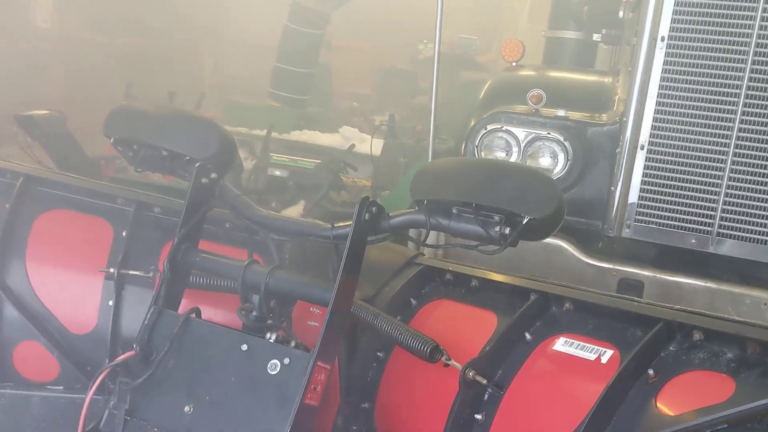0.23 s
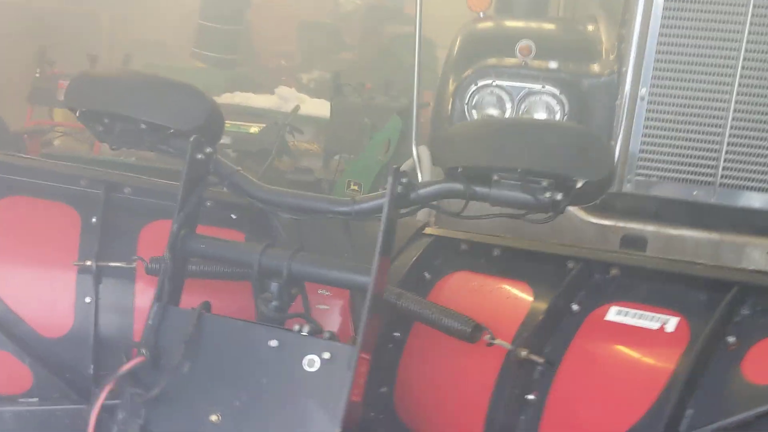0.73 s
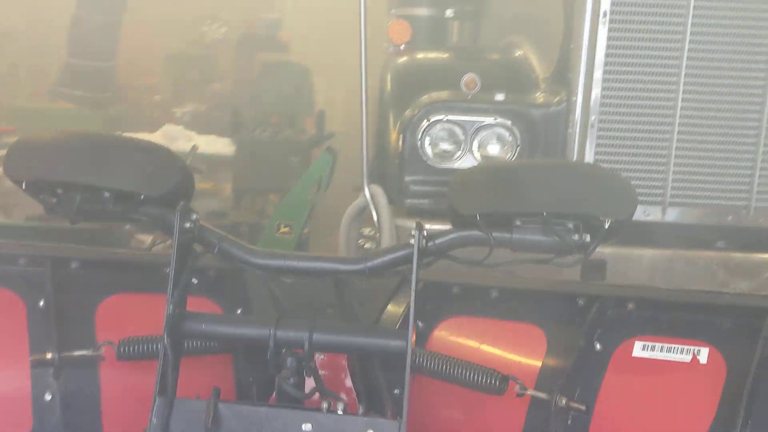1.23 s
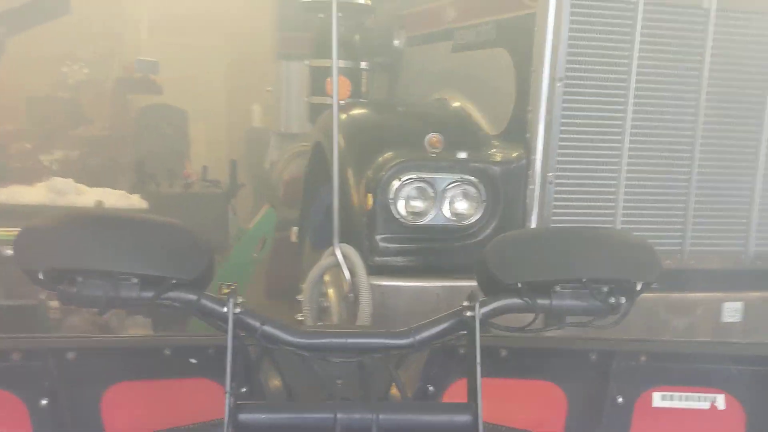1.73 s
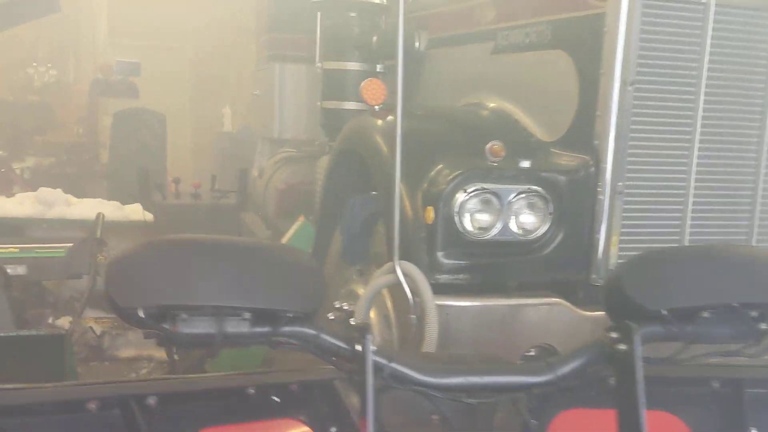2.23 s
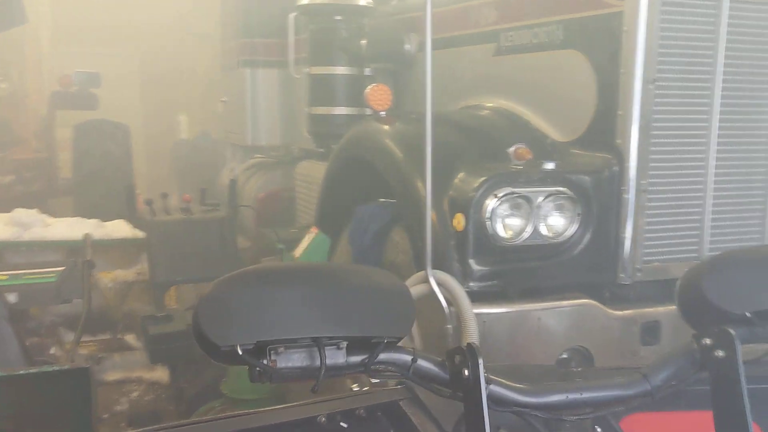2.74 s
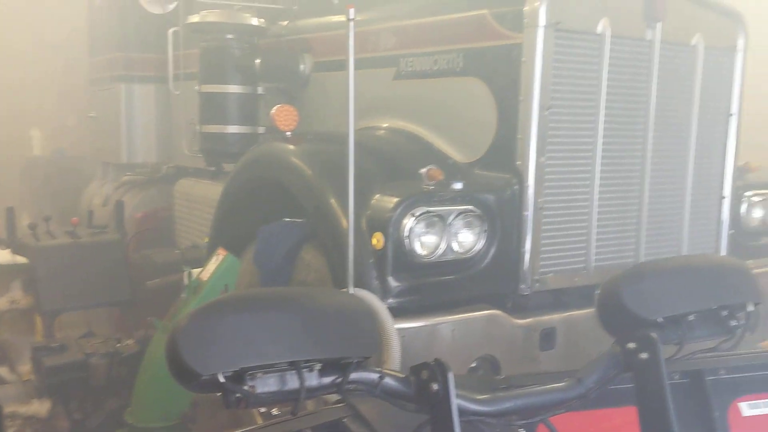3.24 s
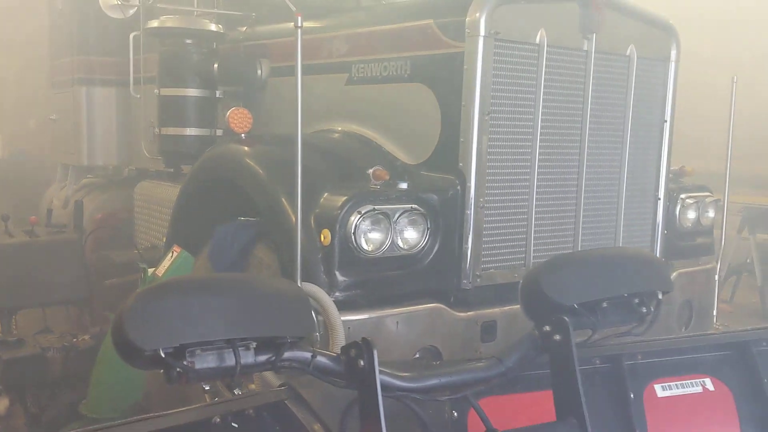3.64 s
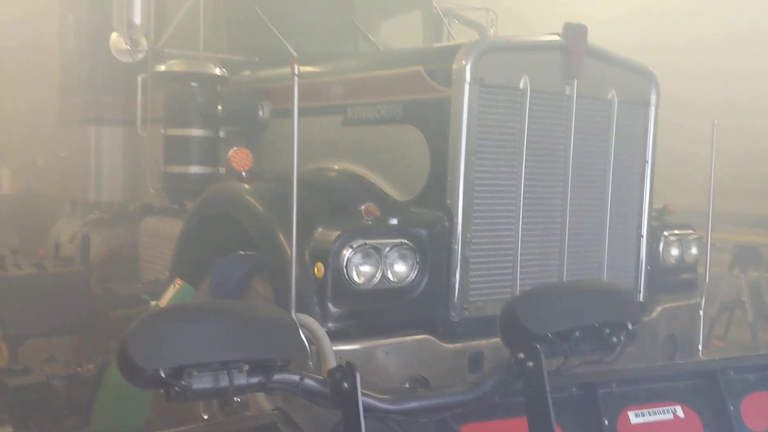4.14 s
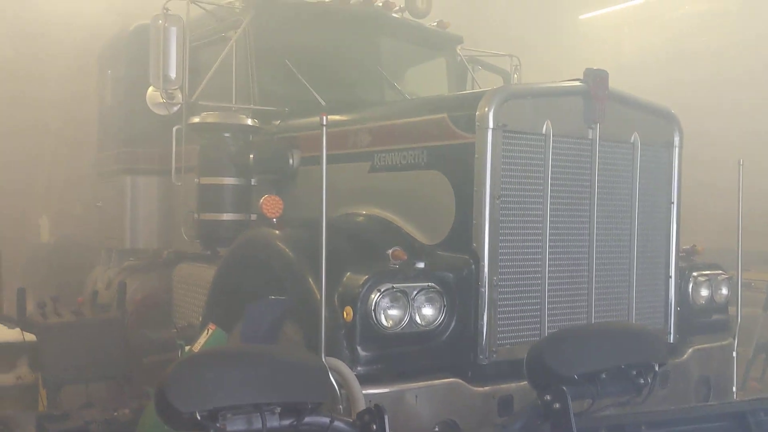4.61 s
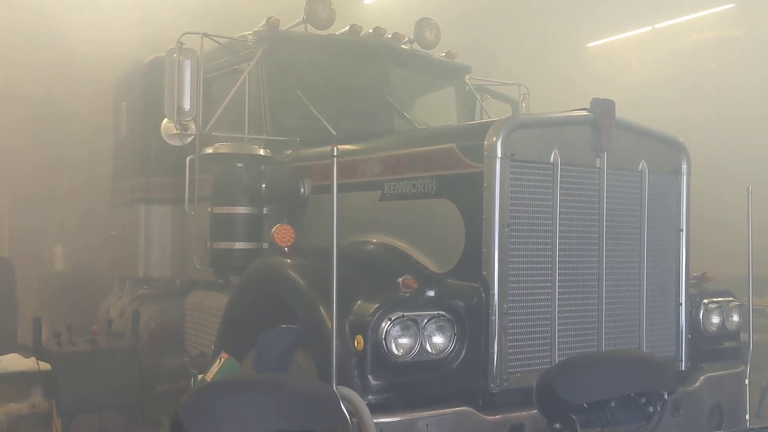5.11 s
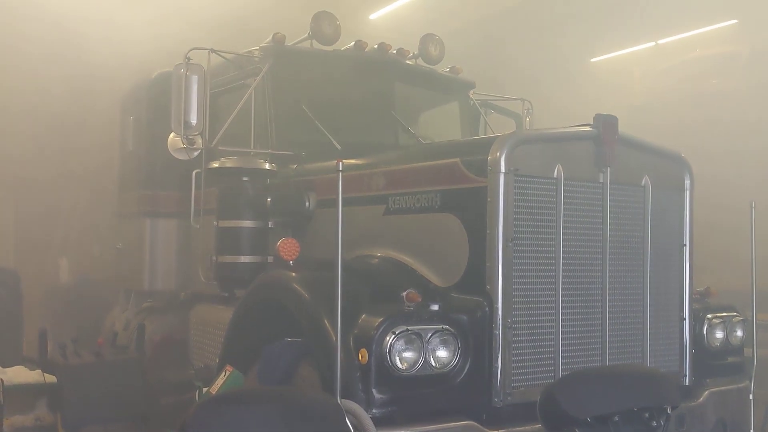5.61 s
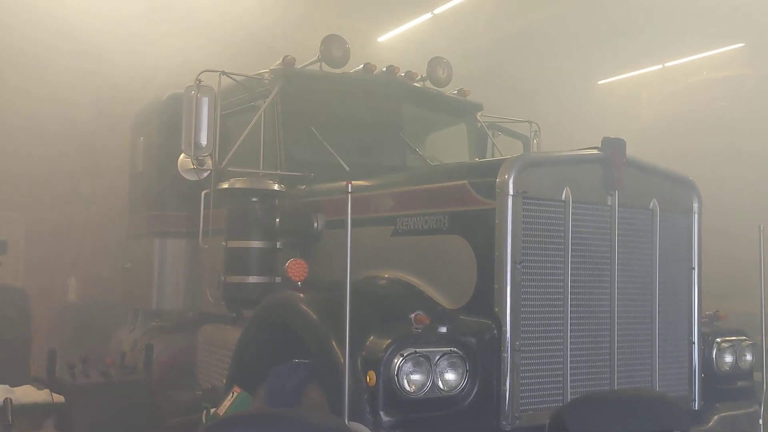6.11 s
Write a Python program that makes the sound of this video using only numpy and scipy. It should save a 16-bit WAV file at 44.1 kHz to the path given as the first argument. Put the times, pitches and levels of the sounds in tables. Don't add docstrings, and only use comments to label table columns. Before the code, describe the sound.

A large two-stroke diesel idles continuously inside a closed workshop, heard in stereo from a few steps away. A strong low drone carries uneven, limping firing pulses, with blower roar, dense valve clatter, rattling thin metal and airy hiss above. Speed sags and recovers every second or so. Around two seconds, tiny bright metal ticks and faint jingling come close to the microphone, then vanish while the engine continues.

```python
import sys
import numpy as np
from scipy import signal
from scipy.fft import rfft, irfft, next_fast_len
from scipy.io import wavfile
from scipy.ndimage import uniform_filter1d, map_coordinates

SR = 44100
rng = np.random.default_rng(int(sys.argv[2]) if len(sys.argv) > 2 else 0)


def volts_from_db(level):
    exponent = np.asarray(level, float) / 20
    return 10 ** exponent


def persist_wave(psi):
    counts = np.round(np.clip(psi, -1, 1) * 32767).astype(np.int16)
    wavfile.write(sys.argv[1], SR, np.atleast_2d(counts).T)


N = 280454

IDLE_RPS = 8.62

# t/s, speed/(rev/s)
SHAFT_SPEED = [(0, 8.53), (.41, 8.546), (.68, 8.743), (.89, 8.64), (1.6, 8.604), (1.9, 8.712),
               (2.37, 8.508), (2.72, 8.532), (3.1, 8.803), (3.32, 8.687), (3.79, 8.317), (4.13, 8.57),
               (4.41, 8.925), (4.62, 8.902), (5.17, 8.316), (5.59, 8.482), (6.13, 8.86), (6.36, 8.7)]


def speed():
    return curves(SHAFT_SPEED)[0]


def crank():
    return np.cumsum(speed()) / SR + .013


def sensed():
    flywheel_s = .15
    return uniform_filter1d(speed(), round(flywheel_s * SR), mode="nearest")


# order/(cycles per turn), level/dB rms
SIDE_ORDERS = [(3, -50), (5, -39), (6, -51), (7, -35), (9, -36), (10, -35), (14, -40), (15, -35), (16, -28),
               (17, -30), (18, -38), (19, -39), (20, -30), (21, -28), (22, -35), (23, -43), (24, -41),
               (25, -35), (26, -34), (27, -39), (28, -38), (29, -41)]


def drone():
    step = 16
    angle = 2 * np.pi * crank()[::step]
    sag = np.maximum(IDLE_RPS - sensed()[::step], 0)
    back = camera()[0][::step]

    boom_rps, boom_fall_db = 8.71, 65
    boom_db = -boom_fall_db * (sensed() - boom_rps) ** 2
    twelfth_db = (level(-12.5, .5, -1.5, -1) + boom_db)[::step]
    fourth_db = level(-26.5, 1, 5, -1)[::step]
    eighth_db = level(-33, 9, 9, -5)[::step]
    throb_db = level(0, 8, -3, 1)[::step]
    growl_db = level(-2.5, 9.5, 2.5, .5)[::step]
    rasp_db = level(-.5, -3, -1, 1)[::step]
    swell_db = [0, throb_db, growl_db, rasp_db]

    limp = volts_from_db(-7 - .4 * twelfth_db) * np.cos(angle - .55)
    twelfth_phase = 12 * angle + .1 + .28 * limp + .18 * wobble(5)[::step]
    tone = volts_from_db(twelfth_db) * (1 + .17 * limp) * np.cos(twelfth_phase)
    tone += volts_from_db(fourth_db) * np.cos(4 * angle)
    tone += volts_from_db(eighth_db) * np.cos(8 * angle + 2)

    pushing_orders = (7, 26)
    fuel_turn, path_turn = 5.5, 2
    for order, db in SIDE_ORDERS:
        group = np.searchsorted([13, 18, 22], order)
        lag = np.pi * (order not in pushing_orders) - 1.3 * max(order - 17, 0)
        if order % 4 == 0:
            lag = np.pi + fuel_turn * sag + path_turn * back * (order > 16)
        phase = lag + rng.normal(0, .01 * order) + .03 * order * wobble(3)[::step]
        order_db = db + swell_db[group] + 2.3 * wobble(3)[::step]
        tone += volts_from_db(order_db) * np.cos(order * angle + phase)
    lean = panned(level(-.76, -.15, 1.45, 0))
    return lean * np.sqrt(2) * signal.resample_poly(tone, step, 1)[:N]


# crank position/turn, level/dB
CYLINDERS = [
    (0.052, 4.5),
    (.17, 4.5),
    (0.308, -3.5),
    (0.419, 4),
    (0.541, -1.5),
    (.69, -5.5),
    (0.807, -16),
    (0.938, 2.5),
]


def puffs():
    turns = crank()
    return sum(volts_from_db(db) * np.exp(-((turns - at) % 1) / .06) for at, db in CYLINDERS)


def firing_train():
    turns, size = crank(), 2048
    bins = np.arange(size // 2 + 1)
    trains = irfft(np.exp(2j * np.pi * rng.random((2, 18, len(bins)))) * (bins < 200))
    where = [turns / 3.5, turns % 1 * size]
    pair = np.array([map_coordinates(np.pad(t, ((0, 0), (0, 1)), "wrap"), where, order=1) for t in trains])
    blend = where[0] % 1
    return pair / np.hypot(blend, 1 - blend)


# f/Hz, level/(dB per Hz)
STACK = [(150, -18), (255, -3), (292, 4.5), (328, -4), (361, 4), (389, -9.5), (429, -2), (470, -26),
         (600, -59), (1500, -120)]


def exhaust(train, firing):
    fuel = np.clip(8.9 - speed(), 0, 1)
    blow = 0.47 + (0.55 + 0.88 * fuel) * firing
    return volts_from_db(level(-22, 3, -5.5, -1)) * spread(blow * train, STACK)


# f/Hz, level/(dB per Hz)
BLOCK = [(350, -38), (470, -4), (540, -4.5), (683, -2), (735, -5.5), (877, 1), (1100, -9.5), (1430, -18),
         (2400, -120)]


def block(train, firing):
    lean = panned(level(-.43, 0, .84, -2.6))
    return volts_from_db(level(-27, 2.5, 1, 1)) * lean * spread((1.2 + firing) * train, BLOCK)


def bark():
    train, firing = firing_train(), puffs()
    return shop(exhaust(train, firing) + block(train, firing))


# f/Hz, level/(dB per Hz)
ROAR = [(250, -10.5), (330, -11.5), (500, -12), (734, -8.5), (880, -5), (1170, -9), (1570, -10),
        (1800, -14), (2020, -27), (2400, -23.5), (3000, -47), (5000, -120)]


def blower(breath_db):
    angle = 2 * np.pi * crank()
    pulse_db = 0.26 * np.cos(angle - 2.5) + 0.57 * np.cos(4 * angle - 1.1)
    roar_db = level(-24.5, 2.5, 1, 1) + pulse_db + 0.11 * breath_db
    lean = panned(level(2.07, 0, .84, -2.6))
    return shop(volts_from_db(roar_db) * lean * rush(ROAR, patchy_db=0.2))


# f/Hz, level/(dB per Hz)
VALVES = [(1500, -60), (1900, -1.5), (2300, -1.5), (2800, -6.5), (3600, -14), (6000, -120)]


def valves(breath_db):
    valve_db = level(-39, 4, 1, 5.5) + .2 * breath_db
    return volts_from_db(valve_db) * panned(level(2.88, 2, -6.5, -6)) * rush(VALVES, patchy_db=1.0)


# f/Hz, level/(dB per Hz)
CLATTER = [(2000, -52), (2700, -8), (3220, 0), (3630, -4.5), (4150, -2), (4850, -6.5), (5100, -39),
           (6630, -52), (11200, -120)]


def rattle(breath_db):
    return volts_from_db(level(-35.5, 3.5, -.5, 1) + 0.2 * breath_db) * rush(CLATTER, patchy_db=.9)


# f/Hz, level/(dB per Hz)
HISS = [(4500, -25), (5000, -8.5), (6500, -14.5), (9000, -13), (13000, -17), (16000, -23)]
# f/Hz, width/Hz, level/dB
PORT = [(5685, 880, 13.5), (7540, 870, 6), (9680, 650, 5), (11800, 360, 6), (14900, 2000, 6)]


def hiss(breath_db):
    once = np.cos(2 * np.pi * crank() - 2.5)
    air_db = level(-34.5, 4, 1, .5) + .5 * once + 0.22 * breath_db + 0.42 * wobble(25)
    return volts_from_db(air_db) * unit(filtered(rush(HISS, patchy_db=0.42), peaks(PORT)))


# t/s, peak level/dB, f/Hz, left minus right/dB
TICKS = [(1.9415, -43, 11800, 9), (1.9889, -31, 12000, 14), (2.0488, -35, 11700, 5.5),
         (2.2463, -31, 11300, 4), (2.2892, -32, 15000, 6.5), (2.3132, -33.5, 14900, 8.0),
         (2.3541, -26, 15000, 8.0), (2.3825, -28, 15000, 7.0), (2.4289, -30, 13900, 6.0),
         (2.5032, -27, 15000, 7.5), (2.6644, -46, 11500, -4)]


def ticks():
    out, t = np.zeros((2, N)), np.arange(SR // 8) / SR
    decay = volts_from_db(-60 * t / 0.014) + 0.73 * volts_from_db(-60 * t / 0.12) + .15 * volts_from_db(-60 * t / .3)
    for s, db, hz, pan_db in TICKS:
        fizz = rng.standard_normal((2, len(t))) * decay
        fizz *= 1 - np.exp(-t / .001)
        band = signal.butter(2, [0.94 * hz, min(1.04 * hz, SR / 2.2)], "band", fs=SR, output="sos")
        snap = signal.sosfilt(band, fizz) + 0.41 * np.diff(fizz, prepend=0) * volts_from_db(-60 * t / .15)
        out[:, round(s * SR):][:, :len(t)] += volts_from_db(db + 4.5) * panned(pan_db - 4)[:, None] * snap
    return out


def jingle():
    start_s, rise_s, hold_s, t60_s = 2.27, .25, .26, .4
    grains = volts_from_db(5.5 * wobble(120)) * rng.standard_normal((2, N))
    bright = lambda hz: np.exp(-((hz - 14800) / 1500) ** 2) + .3 * np.exp(-((hz - 11800) / 900) ** 2)
    t = np.arange(N) / SR - start_s
    fade = np.maximum(-t / rise_s, 0) + np.maximum((t - hold_s) / t60_s, 0)
    return volts_from_db(-44 - 60 * fade) * unit(filtered(grains, bright))


# f/Hz, level/(dB per Hz)
RUMBLE = [(12, -60), (22, -30), (54, -27), (82, -28), (103, -30), (125, -9), (200, -13.5), (300, -2.5),
          (500, -48), (650, -38), (1100, -120)]


def rumble():
    return volts_from_db(-34) * rush(RUMBLE, patchy_db=1.5)


# f/Hz, width/Hz, level/dB
SHOP_MODES = [(431, 9, 6.5), (505.6, 8.3, 12.5), (590, 11.6, 6.5), (695.6, 8.9, 8.5), (856, 8.7, 2)]


def shop(x):
    share = 0.42 + 0.81 * camera()[0]
    return x + share * (filtered(x, peaks(SHOP_MODES)) - x)


# t/s, stepped back/(0-1), swung toward the grille/(0-1)
CAMERA = [
    (0, 0, 0),
    (.6, 0.05, 0.5),
    (2.5, 0.46, 0.23),
    (4.65, .7, 0.33),
    (5.1, 0.84, 0.97),
    (6.36, 0.92, .85),
]


def camera():
    return curves(CAMERA)


def level(idle_db, fuel_db, back_db, swing_db):
    rack_lag_s, rack_curve = 0.18, 3.6
    t, sag = np.arange(N) / SR, IDLE_RPS - sensed()
    late = np.interp(t - rack_lag_s, t, sag)
    fuel = late + rack_curve * late ** 2
    back, swing = camera()
    return idle_db + fuel_db * fuel + back_db * back + swing_db * swing


# f/Hz, likeness/(-1 to 1)
ALIKE = [(60, 0.41), (130, 0.89), (290, 0.91), (640, 0.57), (1410, 0.64), (2400, -0.24), (3100, -0.073),
         (6820, -0.1), (15000, -0.045)]


def spread(pair, spectrum):
    turn = lambda hz: np.arccos(np.clip(along(ALIKE, hz), -1, 1)) / 2
    colour = lambda hz: volts_from_db(along(spectrum, hz)) * [np.cos(turn(hz)), np.sin(turn(hz))]
    mid, side = filtered(pair, colour)
    return unit(np.array([mid + side, mid - side]))


def rush(spectrum, patchy_db):
    shape = (2, 257, N // 256 + 3)
    z = rng.standard_normal(shape) + 1j * rng.standard_normal(shape)
    field = uniform_filter1d(uniform_filter1d(rng.standard_normal(shape[1:]), 6, 0), 12, 1)
    patchy = z * volts_from_db(patchy_db * unit(field))
    noise = signal.istft(patchy, nperseg=512, window="cosine")[1][:, :N]
    return spread(noise, spectrum)


def peaks(modes):
    return lambda hz: volts_from_db(sum(db / (1 + (2 * (hz - c) / w) ** 2) for c, w, db in modes))


def panned(db):
    return volts_from_db(np.array([db / 2, -db / 2]))


def unit(x):
    return x / np.sqrt(np.mean(x ** 2) + 1e-20)


def along(points, hz):
    f, v = np.transpose(points)
    return np.interp(np.log(hz + 1), np.log(f + 1), v)


def curves(rows):
    s, *cols = np.transpose(rows)
    return [np.interp(np.arange(N) / SR, s, c) for c in cols]


def wobble(rate):
    coarse = np.arange(0, N + 64, 64)
    knots = rng.standard_normal(int(N * rate / SR) + 4)
    return np.interp(np.arange(N), coarse, map_coordinates(knots, [coarse * rate / SR]))


def filtered(x, response):
    m = next_fast_len(N + 8192)
    return irfft(rfft(x, m) * response(np.fft.rfftfreq(m, 1 / SR)), m)[..., :N]


def scene():
    breath_db = wobble(9)
    engine = drone() + bark() + blower(breath_db) + valves(breath_db) + rattle(breath_db) + hiss(breath_db)
    return engine + ticks() + jingle() + rumble()


def band_limit(x):
    return signal.sosfilt(signal.butter(12, 15860, fs=SR, output="sos"), x)


# f/Hz, left minus right/dB
LEAN = [(60, -0.5), (210, 0.0), (500, 2.0), (1170, 4.5), (1790, 7.0), (2740, -1.0), (4190, 2.0),
        (6410, 4.5), (9810, 0.5), (15000, 5.5)]
# f/Hz, left ahead/radians
LEAD = [(100, 0), (520, -.6), (1290, -.4), (2200, 0)]


def record(dry):
    capsules = lambda hz: panned(along(LEAN, hz)) * np.exp(.5j * np.outer([1, -1], along(LEAD, hz)))
    x = filtered(dry, capsules)
    x = x / (1 + abs(x / .75) ** 8) ** (1 / 8)
    band = lambda hz: (hz < 15850) * hz ** 4 / (hz ** 4 + 15 ** 4)
    return band_limit(filtered(x, band))


dry = scene()
out = record(dry)
persist_wave(out)
```